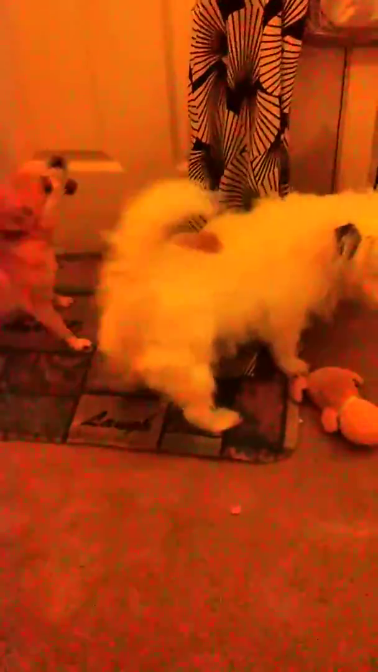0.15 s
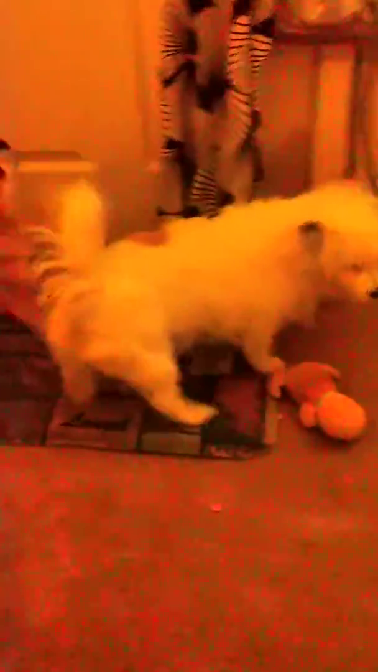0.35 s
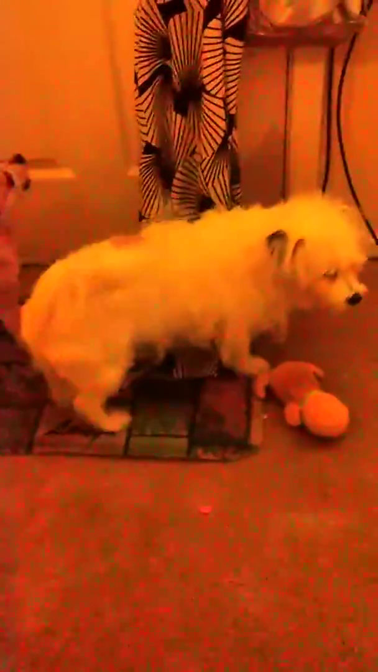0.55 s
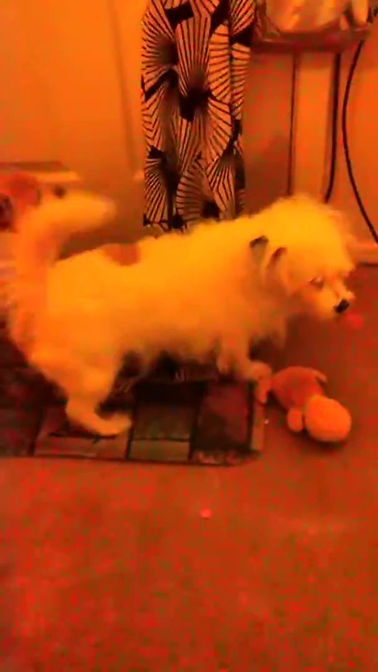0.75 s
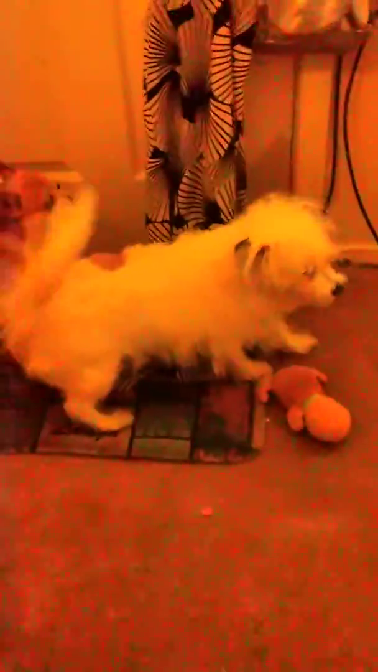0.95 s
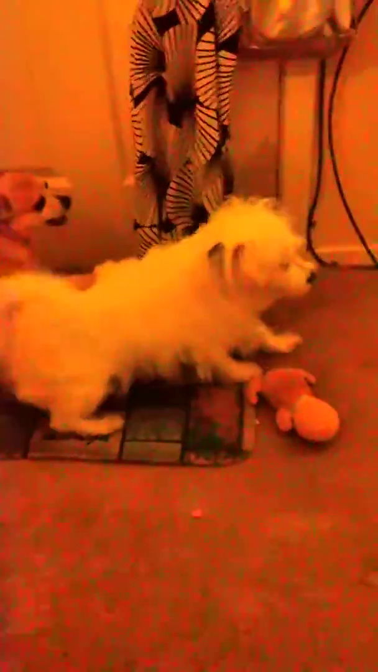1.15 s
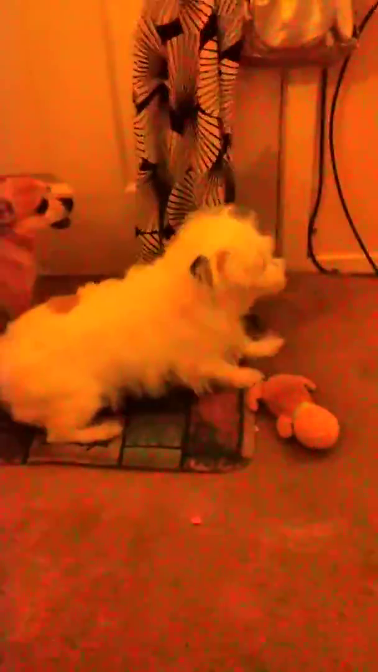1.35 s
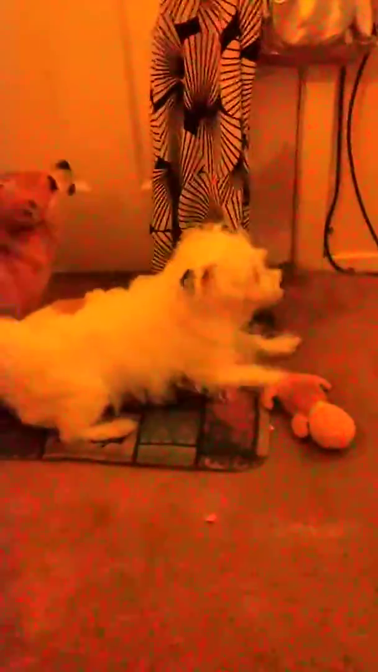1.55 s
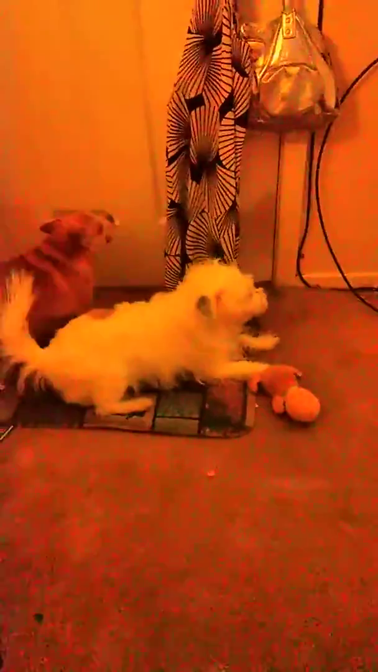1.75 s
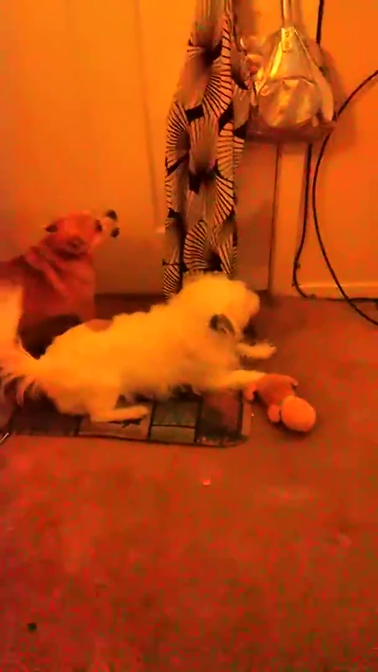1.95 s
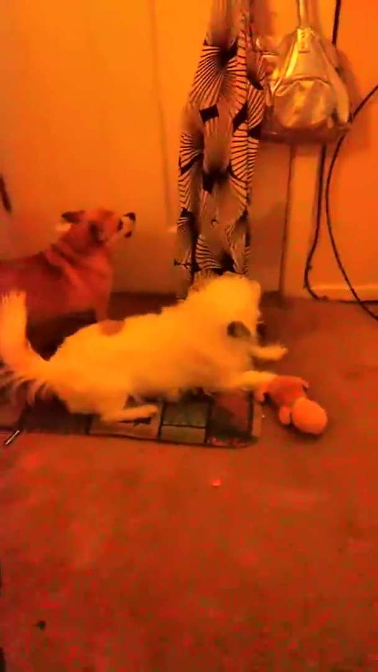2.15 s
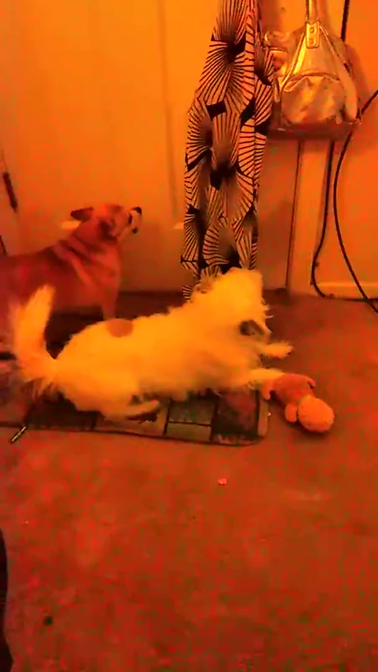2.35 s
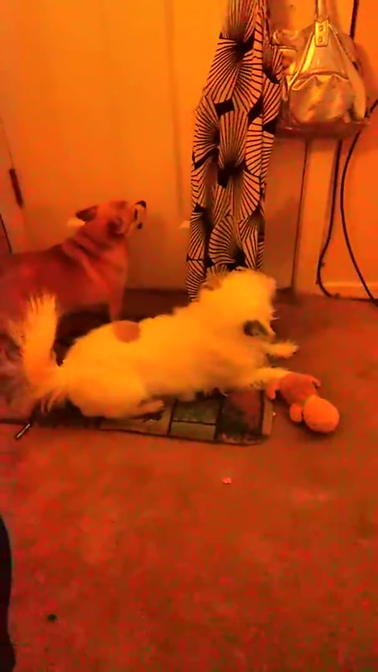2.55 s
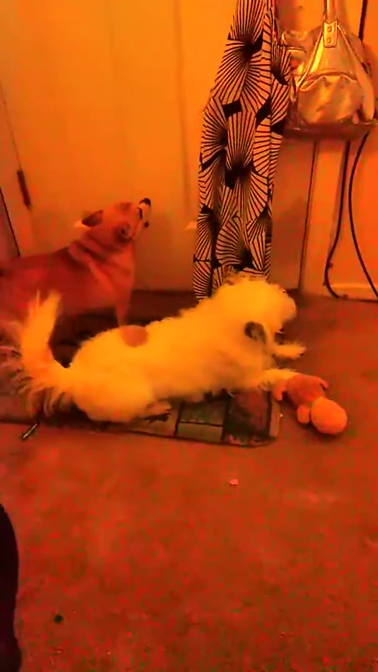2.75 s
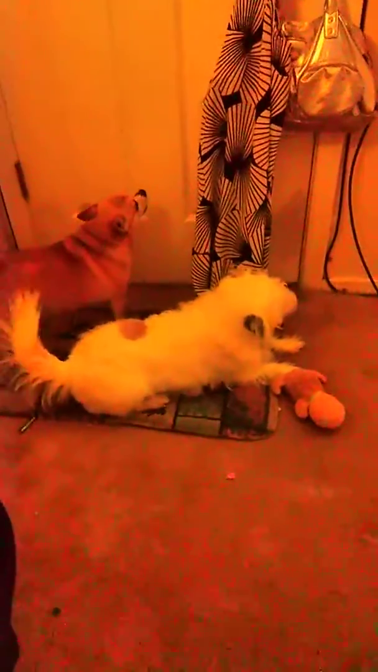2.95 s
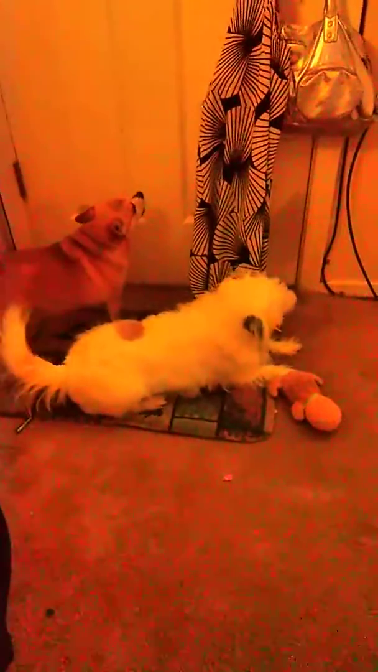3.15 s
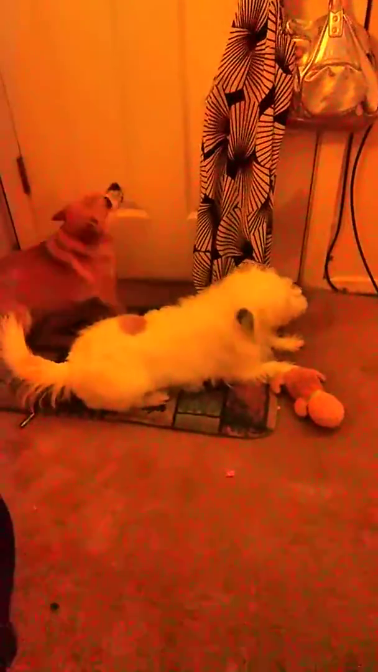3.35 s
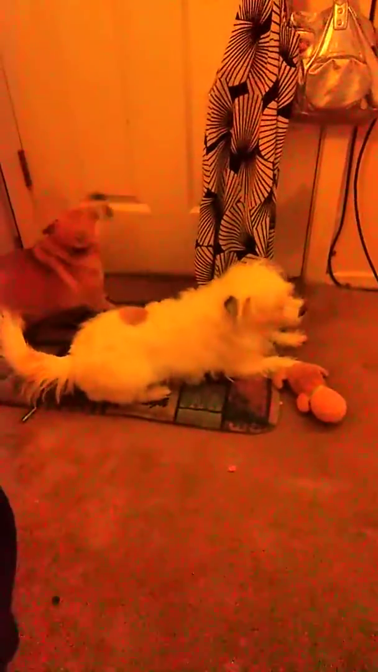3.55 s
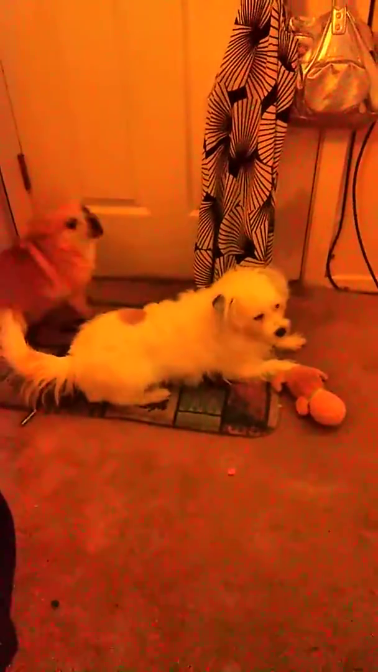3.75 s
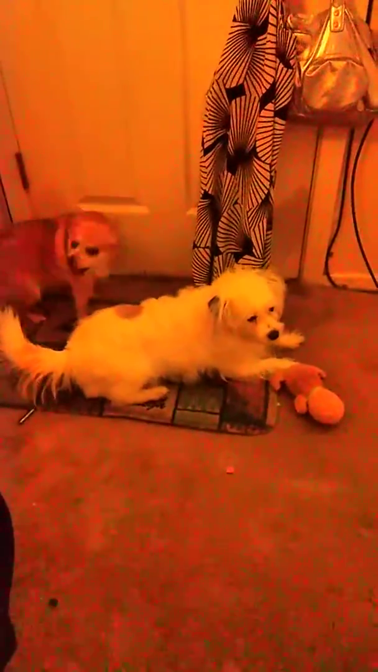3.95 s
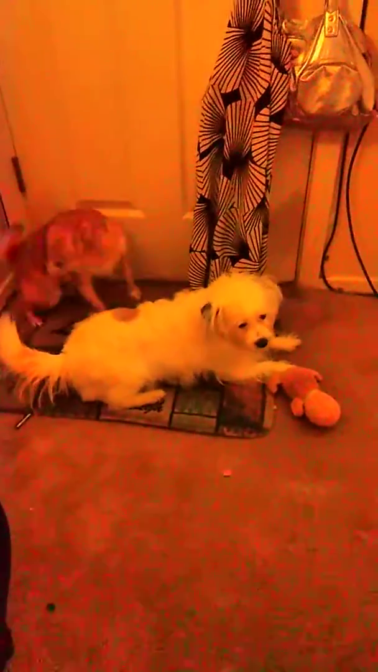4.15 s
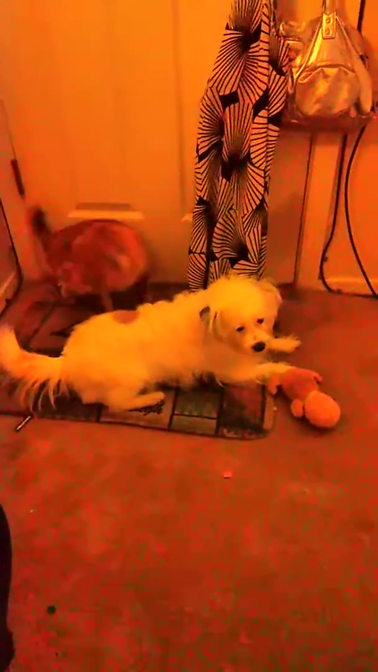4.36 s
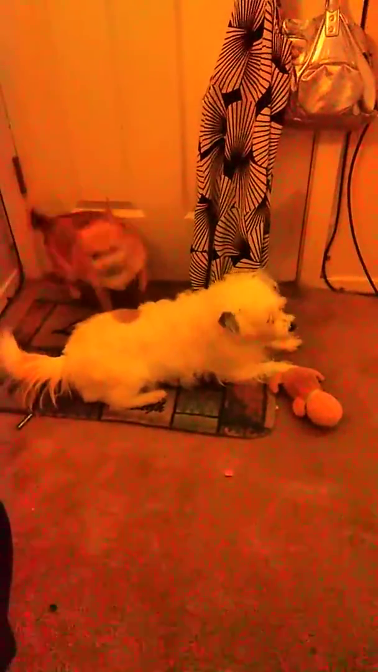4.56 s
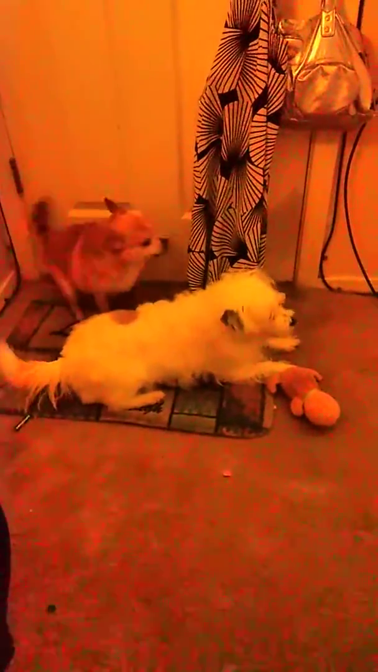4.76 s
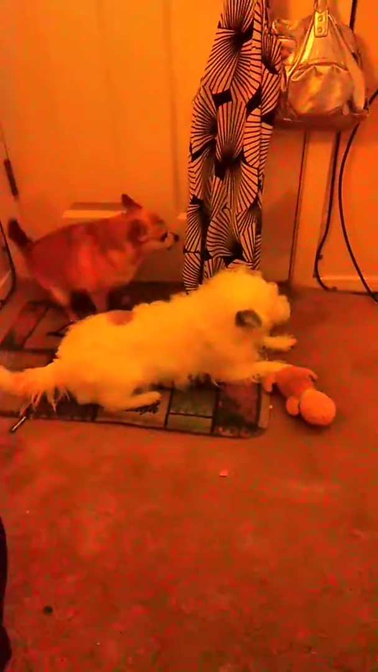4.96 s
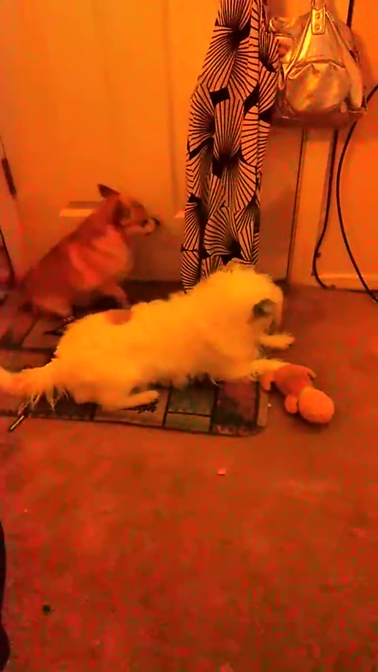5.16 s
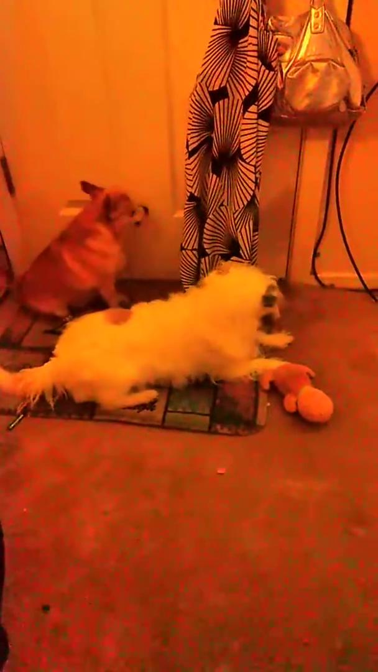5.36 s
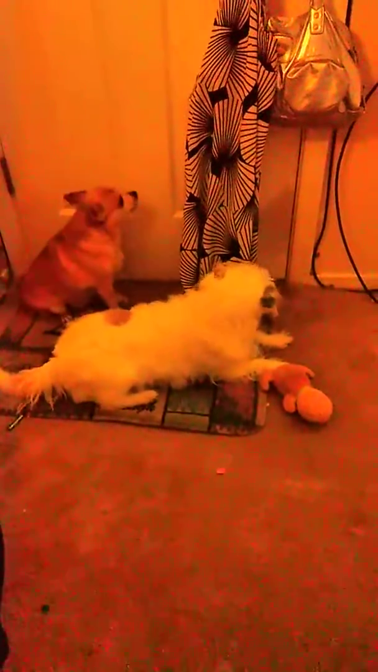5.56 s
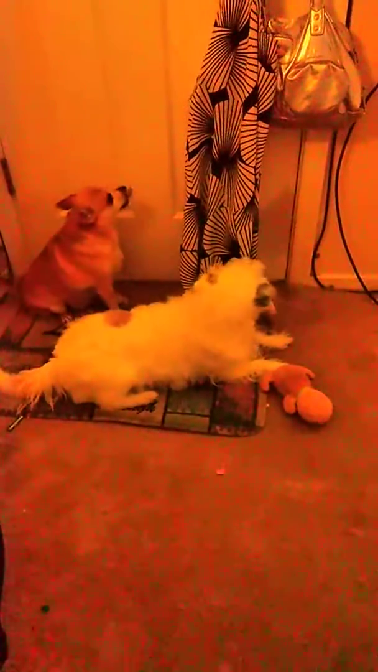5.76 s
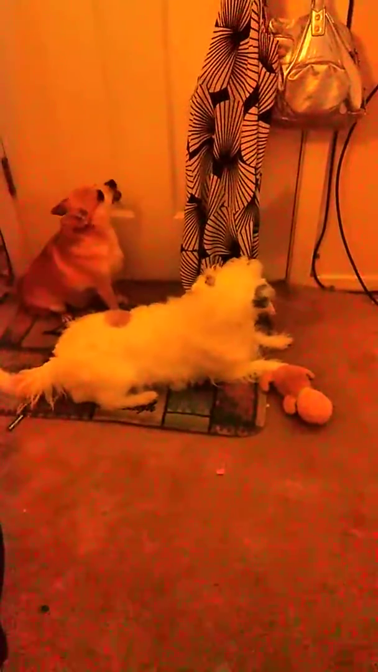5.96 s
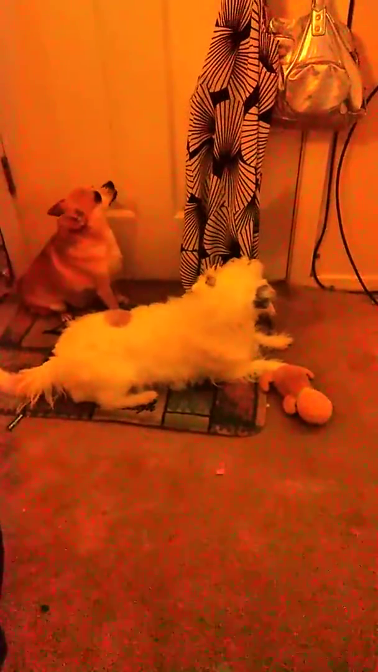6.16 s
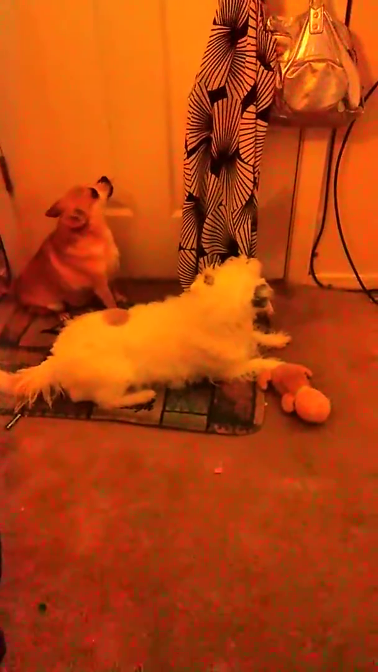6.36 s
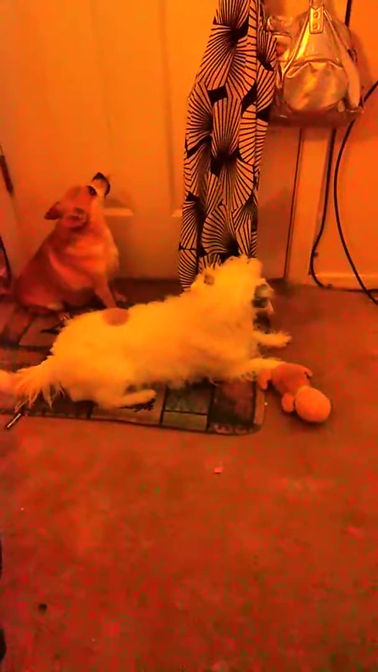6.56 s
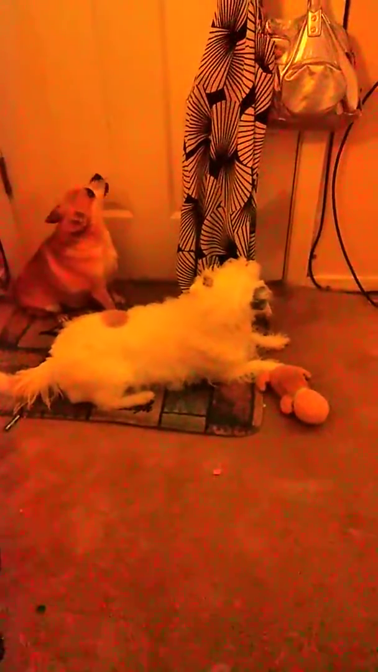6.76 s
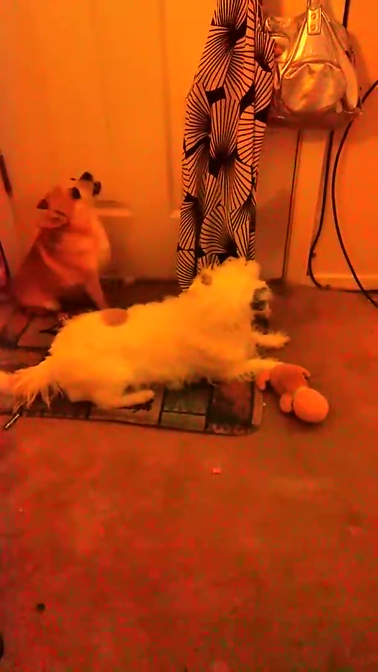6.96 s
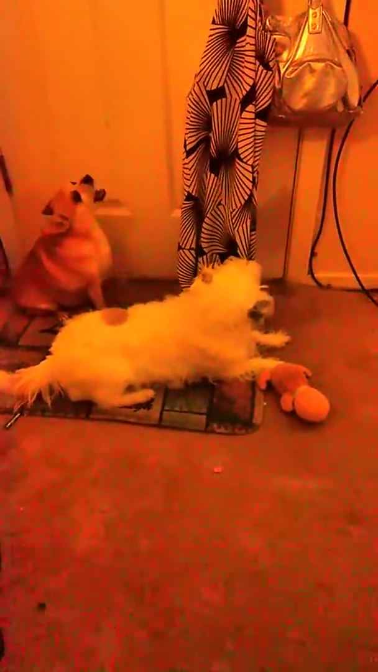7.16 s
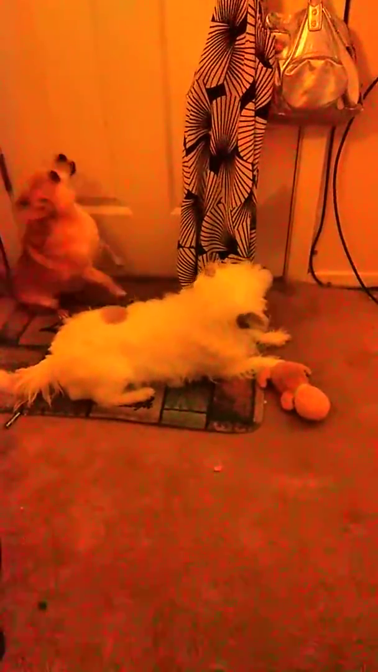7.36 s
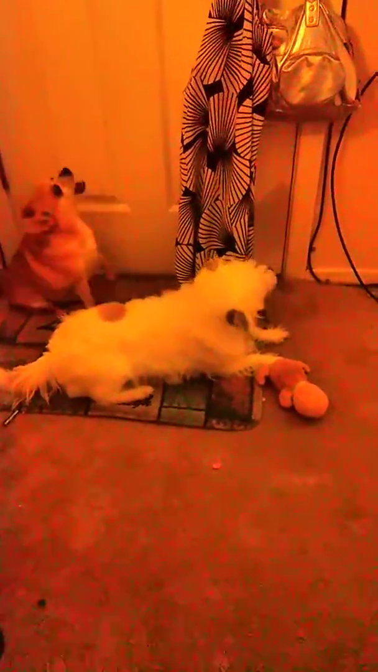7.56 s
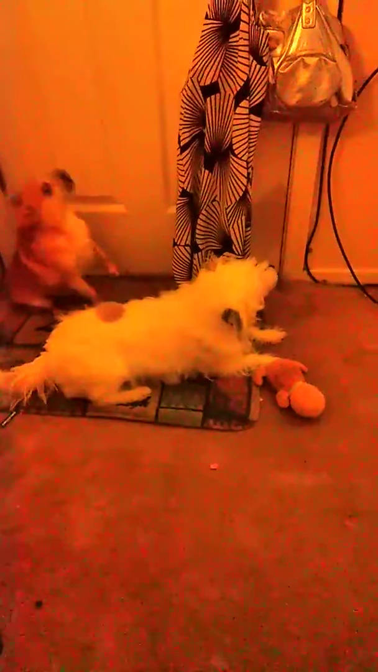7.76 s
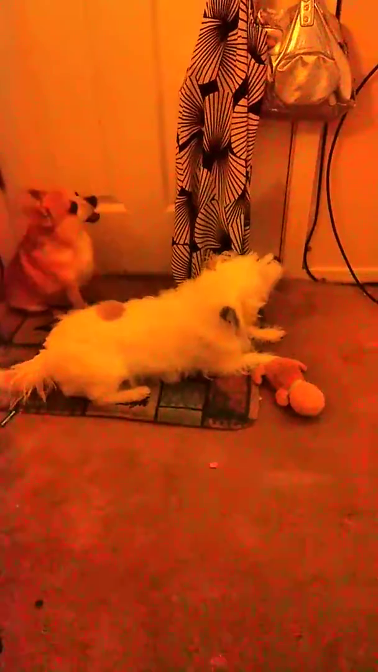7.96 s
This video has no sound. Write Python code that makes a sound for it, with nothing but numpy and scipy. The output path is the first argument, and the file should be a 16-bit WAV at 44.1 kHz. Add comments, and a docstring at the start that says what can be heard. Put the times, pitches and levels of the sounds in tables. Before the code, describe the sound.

Indoors by a door, sharp high yaps and lower breaking barks come from two dogs, with faint snuffles, thumps and a low room hum between.

```python
"""Two small dogs bark at a door in a carpeted room: one yaps in high, raspy arches and ends on a thin whine,
the other barks lower, its voice breaking upward in mid-bark. Both are pulsing-fold harmonics through a throat
filter, plus gated noise for rasp. Between barks: a stuttering pulsed grunt, snuffles and ticks of filtered
noise, thumps of damped sines. Hum is coloured noise with a drone; echoes and a short tail make the room."""
import sys
import numpy as np
from scipy import signal
from scipy.fft import rfft, irfft, next_fast_len
from scipy.io import wavfile
from scipy.ndimage import uniform_filter1d, minimum_filter1d

SR = 44100
rng = np.random.default_rng(int(sys.argv[2]) if len(sys.argv) > 2 else 0)


def bounce(signal):
    """Save signal as a 16-bit WAV file at the path given by the first command-line argument."""
    frames = np.transpose(np.atleast_2d(signal))
    limited = np.clip(frames, -1, 1)
    pcm = np.round(limited * 32767).astype(np.int16)
    wavfile.write(sys.argv[1], SR, pcm)


N = 352800

# Source levels are relative: room and mix gains follow.
# High yaps. Each row: start, crest and end in seconds, start and crest pitch in Hz, level in dB,
# rasp in relative dB (capped at 4), twang in dB, half-pitch lines in dB.
YAPS = [(.211, 0.291, 0.34, 560, 1306, -15, -8, 8, -6.5),
        (1.885, 1.962, 2.012, 898.7, 1566, -16, 2.5, -2.5, -29),
        (3.241, 3.334, 3.384, 992, 1581, -16, 6, -3.5, -32.5),
        (3.639, 3.708, 3.772, 818.7, 1528, -15.5, 2.5, 1, -31.5),
        (6.844, 6.918, 6.962, 1155, 1553, -14.5, 1, -4.5, -32),
        (7.254, 7.334, 7.384, 1138, 1648, -13.5, -1.5, -12.5, -48),
        (7.66, 7.735, 7.79, 874, 1540, -13.5, 1.5, -1.5, -33)]
# The yapper's throat, and the hiss in it. Each row: frequency in Hz, gain in dB.
YAP_THROAT = [(600, -18.5), (900, 5.5), (1250, -0.5), (1550, 1.5), (1900, -0.5), (2150, -12), (2350, -2),
              (2600, -28), (3100, -10.5), (3800, -27), (5500, -29), (7500, -41), (10000, -54.5),
              (12500, -39.5), (15000, -103)]
YAP_RASP = [(170, -14), (450, -17.5), (750, -13.5), (1050, -3.5), (1450, -3), (2050, 3.5), (2500, -8),
            (3200, -5.5), (4200, -12.5), (5500, -57), (7800, -26), (9800, -36.5), (12500, -28.5),
            (15000, -65.5)]
# Lower barks. Each row: start, voice break and end in seconds, crest pitch in Hz, level in dB,
# rasp in relative dB (capped at 3), twang in dB.
BARKS = [(0.839, 0.895, 1.024, 956, -16.5, -2.5, -3), (2.378, 2.452, 2.574, 946.5, -15.5, 1.5, -4.5),
         (3.931, 3.997, 4.122, 922, -16.5, 16.5, -8), (5.358, 5.417, 5.538, 947.7, -16, -5.5, -3),
         (7.058, 7.123, 7.246, 944.7, -15, 3, -3)]
# The lower dog's throat, and the hiss in it. Each row: frequency in Hz, gain in dB.
BARK_THROAT = [(250, -2), (450, -7.5), (650, -1.5), (790, -5), (960, 2.5), (1200, -26), (1450, -13),
               (1850, 1), (2100, -12), (2400, -8.5), (2800, -18.5), (3400, -32.5), (4900, -34.5),
               (5700, -46), (6800, -32), (9500, -64), (14000, -61)]
BARK_RASP = [(150, -15.5), (500, -1.5), (950, 5.5), (1200, -17.5), (1800, -9.5), (2500, -11), (3400, -17.5),
             (4900, -12), (5600, -32.5), (6800, -16), (9500, -38), (14000, -27), (16000, -32.5)]
# Course of the closing whine. Each row: time in seconds, pitch in Hz, level in relative dB.
WHINE = [(7.9, 1563, -21), (7.912, 1566, -31), (7.94, 1435, -16.5), (7.954, 1474, -29),
         (7.972, 1459, -18.5), (8.0, 1390, -30.5)]
# Throat during the whine. Each row: frequency in Hz, gain in dB.
WHINE_THROAT = [(1500, -1), (2900, -21.5), (4400, -40), (5900, -36), (7300, -46), (9000, -55)]
# Puffs of the grunt. Each row: start in seconds, length in seconds, level in dB.
GRUNTS = [(1.483, .014, -27.5), (1.514, 0.02, -29.5), (1.531, .032, -24.5)]
# Throat during the grunt. Each row: frequency in Hz, gain in dB.
GRUNT_THROAT = [(150, -3), (600, -14.5), (850, -6.5), (1180, -6), (1700, -25), (3500, -32.5), (9000, -58)]
# Snuffles. Each row: start in seconds, length in seconds, level in dB.
SNUFFLES = [(0.694, 0.11, -51.5), (1.323, 0.12, -43), (1.436, 0.028, -43), (1.552, 0.098, -43.5),
            (2.702, 0.27, -50), (3.156, 0.061, -52), (3.489, 0.12, -50), (4.476, 0.13, -45),
            (7.871, 0.062, -43)]
# Spectrum of air in the snout. Each row: frequency in Hz, gain in dB.
SNOUT = [(710, -79), (1200, -25.5), (1610, -11.5), (2020, 3), (2650, -9.5), (3220, -18), (6800, -28.5),
         (8260, -36.5), (8910, -48), (10600, -32), (16000, -54)]
# Soft thumps on the floor. Each row: start in seconds, level in dB, frequency in Hz, t60 in seconds.
THUMPS = [(1.377, -7.5, 81.6, 0.056), (1.485, -24, 157, 0.088), (1.583, -23, 127.7, 0.093),
          (1.87, -30, 185.4, 0.22), (2.326, -28.5, 124, 0.12), (2.744, -27, 135, 0.19),
          (3.563, -26, 93.1, 0.052), (3.851, -30.5, 103, 0.18), (4.372, -33, 65, 0.31)]
# Small ticks and taps. Each row: start in seconds, level in relative dB, treble relative to the knock in dB.
TICKS = [(0.195, -11.5, -27), (1.363, -14, -30), (1.375, -16, -30), (3.914, -7.5, -22), (4.272, -41, 13.5),
         (5.341, -14, -35), (6.467, -25.5, -28), (6.624, -28.5, -24), (6.668, -23.5, -32), (6.77, -26, -27)]
# Spectrum of the room hum. Each row: frequency in Hz, relative density in dB.
HUM = [(42, -18), (52, -9), (85, -7.5), (115, -16.5), (175, -4), (245, -4.5), (354, -13), (531, -14),
       (700, -18.5), (1900, -28), (3200, -37.5), (6500, -50.5), (14000, -62)]
# Room decay. Each row: frequency in Hz, t60 in seconds.
ROOM_T60 = [(150, 0.57), (600, 0.32), (1200, 0.31), (2400, 0.29), (6000, 0.35), (14000, 0.23)]
# First echoes off door, floor and walls. Each row: delay at left and at right port in seconds,
# level in dB relative to near_db.
ECHOES = [(.0031, .0034, -40.5), (.0073, .0069, -8), (0.0128, .0124, -2), (0.0183, 0.016, -35.5)]
# Room resonances that sing on after a bark. Each row: frequency in Hz, peak gain in dB, t60 in seconds.
ROOM_MODES = [(639, -14, .22), (945, -4, .42), (1190, -9, .35), (1505, -10, .35), (1890, -8, .3),
              (2356, -3, .45)]
# The left port faces the dogs, hears more treble. Each row: frequency in Hz, left minus right in dB.
FACING = [(60, 2), (170, -0.5), (300, 2), (600, -2.5), (1100, 1.5), (2000, 7), (5000, 6.5), (12000, 6)]
# A tightened throat lifts upper partials. Each row: frequency in Hz, lift in dB per dB of twang.
TWANG = [(1300, 0.12), (1900, 0.36), (2400, 0.63), (3300, 1.14), (4500, 1.23), (6500, 0.9), (9000, 0.48),
         (13000, 0.92)]

HUM_DB = -46
TOP_HZ = 16300
# pitch arch of a yap: power 1 = straight sides, 2 = round; ends at a share of its crest
YAP_RISE_POWER, YAP_FALL_POWER, YAP_END_SHARE = 1.5, 1.7, .56
YAP_ATTACK_S, YAP_RELEASE_S = 0.032, 0.018
# rasp bursts out first, clears towards the crest, returns as the folds slacken
YAP_RASP_ATTACK_S, YAP_CLEAR_DB, YAP_SLACK_DB = 0.02, -23.5, -15
# depths before each voice's own scaling
FLUTTER_HZ, YAP_FLUTTER_DEPTH, GROWL_FLUTTER_DEPTH = 210, .55, .28
YAP_PAN_DB, BARK_PAN_DB = -0.5, 2.5  # left minus right
# growl rises and levels off (shares of crest pitch); after the break the note holds, then drops ever faster
GROWL_START_SHARE, GROWL_TOP_SHARE, GROWL_POWER = .25, .68, 2.0
NOTE_END_SHARE, NOTE_DROP_POWER, BREAK_S = .22, 3.5, .004
BARK_ATTACK_S, BARK_RELEASE_S, BARK_RASP_ATTACK_S = 0.047, 0.041, 0.026
NOTE_DB, NOTE_RASP_DB = -6, -10  # relative to the growl
GRUNT_HZ, GRUNT_EDGE_S = 580.5, 0.0039
YAP_LAG_S, BARK_LAG_S = -.00012, 0.00016  # right port behind left
LIMIT_PEAK, LIMIT_S = .99, .002


def undb(db):
    """Decibels to gain."""
    return 10 ** (np.asarray(db) / 20)


def unit(x):
    """Scale to rms 1."""
    return x / np.sqrt(np.mean(x ** 2) + 1e-18)


def read(points, hz):
    """Read (Hz, value) points on a log-frequency axis."""
    f, value = np.transpose(points)
    return np.interp(np.log(hz + 1e-6), np.log(f), value)


def colour(x, points):
    """Filter by (Hz, dB) points, falling away below the first."""
    size = next_fast_len(x.shape[-1] + 2048)
    hz = np.fft.rfftfreq(size, 1 / SR)
    gain = undb(read(points, hz)) * np.minimum(hz / points[0][0], 1) ** 2
    return irfft(rfft(x, size) * gain, size)[..., :x.shape[-1]]


def band(x, lo_hz, hi_hz):
    """Band-pass."""
    sos = signal.butter(2, [lo_hz, min(hi_hz, SR / 2 - 1)], 'band', fs=SR, output='sos')
    return signal.sosfilt(sos, x)


def wobble(t, rate_hz):
    """Random wandering, rate_hz new values a second."""
    values = rng.standard_normal(size=2048)
    return np.interp((t - t[0]) * rate_hz, np.arange(len(values)), values)


def span(start_s, end_s):
    """Sample times between two moments."""
    return np.arange(int(start_s * SR), int(end_s * SR)) / SR


def progress(t, start_s, end_s):
    """0 before start, 1 after end, straight in between."""
    return np.clip((t - start_s) / (end_s - start_s), 0, 1)


def envelope(t, attack_s, release_s):
    """Swell, hold, and die away to nothing at the last sample."""
    attack = np.minimum((t - t[0]) / attack_s, 1)
    release = np.minimum((t[-1] - t) / release_s, 1) ** 1.56
    return attack * release


def eased(x):
    """Fade in and out over about 8 ms, as a voice starts and stops over several cycles."""
    return x * signal.windows.tukey(len(x), min(SR / 60 / len(x), 1))


def add(out, start_s, x, pan_db=0):
    """Mix a sound in, pan_db louder on the left than on the right."""
    i = int(start_s * SR)
    part = x[:N - i]
    out[:, i:i + len(part)] += part * undb(np.array([[pan_db], [-pan_db]]) / 2)


def hum():
    """A low steady rush with a faint motor drone in it."""
    t = np.arange(N) / SR
    mid, side = colour(rng.standard_normal((2, N)), HUM)
    side = side - 0.37 * band(side, 90, 600)  # narrower bass
    rush = (mid + 0.52 * side * np.array([[1], [-1]])) / np.std(mid)
    drone = undb(-58.5) * np.sin(2 * np.pi * 170.3 * t) * (1 + 1.3 * wobble(t, 1.9))
    drone = drone + undb(-53) * np.sin(2 * np.pi * 116 * t) * (1 + 1.6 * wobble(t, 19))
    return rush * undb(HUM_DB + 0.33 * wobble(t, 2.8)) + drone


def earlier_ring():
    """The room's ring from an earlier yap: band noise dying away at 123 dB a second."""
    out = np.zeros((2, N))
    t = span(0, 0.61)
    add(out, 0, unit(band(rng.standard_normal(len(t)), 1040, 1860)) * undb(-34 - 123 * t))
    return out


def ticks():
    """Ticks as the dogs shift about: a short noise knock with some treble, both decaying together."""
    out = np.zeros((2, N))
    t = np.arange(SR // 4) / SR
    for start, db, treble_db in TICKS:
        noise = rng.standard_normal(len(t))
        knock = unit(band(noise, 400, 1200))
        treble = undb(treble_db) * unit(band(noise, 1800, 15000))
        add(out, start, 0.24 * (knock + treble) * undb(db - 60 * t / 0.027))
    return out


def voice(t, hz, throat, jitter, shimmer, half_db, twang_db=0, hoarse=0):
    """Folds with uneven cycles, strong and weak in turn, heard through the throat; also returns their phase."""
    hz = hz * (1 + jitter * wobble(t, 700))
    phase = 2 * np.pi * np.cumsum(hz) / SR
    k = np.arange(1, 49)[:, None] / 2  # half steps: lines between the harmonics
    partial_hz = k * hz
    db = read(throat, partial_hz) + half_db * (k % 1 > 0) + twang_db * read(TWANG, partial_hz)
    # ragged closure of the folds smears the high partials most
    smear = hoarse * (partial_hz / 4000) ** 2 * np.array([wobble(t, 400) for _ in k])
    waves = np.sin(k * phase + np.clip(smear, -6, 6))
    tone = np.sum(undb(db) * (partial_hz < TOP_HZ) * waves, axis=0)
    return np.sqrt(2) * tone * (1 + shimmer * wobble(t, 450)), phase


def rasp(phase, spectrum, depth):
    """Turbulent air, let through once a cycle, in uneven spurts."""
    spurts = undb(2.5 * wobble(np.arange(len(phase)) / SR, 220))
    gate = 1 + depth * np.cos(phase)
    return unit(colour(rng.standard_normal(len(phase)) * gate * spurts, spectrum))


def flutter(t, depth):
    """Loose tissue beats unevenly beside the folds and shakes the voice's level."""
    hz = FLUTTER_HZ * (1 + .2 * wobble(t, 150))
    return 1 + depth * np.sin(2 * np.pi * np.cumsum(hz) / SR)


def mouth(x, stage, shut_db, open_stage, closing_db=-2):
    """The treble blooms as the jaw opens and fades as it closes."""
    treble = signal.sosfiltfilt(signal.butter(2, 2000, 'high', fs=SR, output='sos'), x)
    db = shut_db * np.maximum(1 - stage / open_stage, 0) + closing_db * np.maximum(stage - 1, 0)
    return x + treble * (undb(db) - 1)


def yapper():
    """Each yap climbs roughly to a clear crest and drops."""
    out = np.zeros((2, N))
    for start, crest, end, start_hz, crest_hz, db, rasp_db, twang_db, half_db in YAPS:
        t = span(start, end)
        rise, fall = progress(t, start, crest), progress(t, crest, end)
        climb_hz = (crest_hz - start_hz) * (1 - rise) ** YAP_RISE_POWER
        drop_hz = crest_hz * (1 - YAP_END_SHARE) * fall ** YAP_FALL_POWER
        hz = (crest_hz - climb_hz - drop_hz) * (1 + .014 * wobble(t, 110))
        rough = undb(min(rasp_db, 4))
        # the folds are least steady while the pressure builds
        jitter = (.011 + .022 * (1 - rise)) * np.sqrt(rough)
        tone, phase = voice(t, hz, YAP_THROAT, jitter, shimmer=.13, half_db=half_db,
                            twang_db=twang_db, hoarse=.7 * rough)
        tone = tone * flutter(t, YAP_FLUTTER_DEPTH * rough * (1 - 0.72 * rise ** 2))
        tone = tone * envelope(t, YAP_ATTACK_S, YAP_RELEASE_S)
        air_db = YAP_CLEAR_DB * rise ** 2 * (1 - fall) + YAP_SLACK_DB * fall
        air = rasp(phase, YAP_RASP, depth=1.0) * undb(air_db)
        air = air * envelope(t, YAP_RASP_ATTACK_S, release_s=.006)
        yap = unit(tone) + unit(air) * rough * undb(-9.5)
        yap = mouth(yap, rise + fall, shut_db=-20.5, open_stage=0.58)
        add(out, start, undb(db) * yap, YAP_PAN_DB)
    return out


def snuffles():
    """Air drawn through the snout: coloured noise, softly edged, its level wavering."""
    out = np.zeros((2, N))
    for start, length, db in SNUFFLES:
        t = span(start, start + length)
        air = unit(colour(rng.standard_normal(len(t)), SNOUT)) * undb(0.63 * wobble(t, 120))
        add(out, start, undb(db) * air * signal.windows.tukey(len(t), .7), pan_db=3.5)
    return out


def barker():
    """A low rising growl breaks up by about a fifth into a ringing note, then slides down as the jaw closes."""
    out = np.zeros((2, N))
    for start, crack, end, crest_hz, db, rasp_db, twang_db in BARKS:
        t = span(start, end)
        rise, fall = progress(t, start, crack), progress(t, crack, end)
        broken = progress(t, crack - BREAK_S / 2, crack + BREAK_S / 2)
        growl = GROWL_TOP_SHARE - (GROWL_TOP_SHARE - GROWL_START_SHARE) * (1 - rise) ** GROWL_POWER
        note = 1 - (1 - NOTE_END_SHARE) * fall ** NOTE_DROP_POWER
        hz = crest_hz * (growl + broken * (note - growl)) * (1 + .01 * wobble(t, 70))
        # after the break the folds beat strong-weak, which puts lines between the harmonics
        half_db = -26 + broken * (21 - 12 * fall)
        tone, phase = voice(t, hz, BARK_THROAT, jitter=.008, shimmer=.14, half_db=half_db,
                            twang_db=twang_db, hoarse=.7)
        tone = tone * flutter(t, GROWL_FLUTTER_DEPTH * (1 - 0.704 * broken)) * undb(NOTE_DB * broken)
        tone = tone * envelope(t, BARK_ATTACK_S, BARK_RELEASE_S)
        air = rasp(phase, BARK_RASP, depth=1.0) * undb(NOTE_RASP_DB * broken)
        air = air * envelope(t, BARK_RASP_ATTACK_S, release_s=0.052)
        bark = unit(tone) + unit(air) * undb(min(rasp_db, 3) - 15)
        bark = mouth(bark, rise + fall, shut_db=-18.5, open_stage=0.3)
        add(out, start, undb(db) * bark, BARK_PAN_DB)
    return out


def thumps():
    """The carpeted floor gives a few damped swings under each bump."""
    out = np.zeros((2, N))
    t = np.arange(SR // 4) / SR
    contact = 1 - np.exp(-(t / .0008) ** 2)
    for start, db, hz, t60 in THUMPS:
        swing = np.sin(2 * np.pi * hz * t + np.pi * 2 / 3)
        add(out, start, undb(db - 60 * t / t60) * swing * contact)
    return out


def grunt():
    """A stuttering grunt: short puffs of unsteady voice with rasp."""
    out = np.zeros((2, N))
    for start, length, db in GRUNTS:
        t = span(start, start + length)
        tone, phase = voice(t, GRUNT_HZ, GRUNT_THROAT, jitter=0.048, shimmer=0.23, half_db=-17.5)
        puff = tone + undb(-7) * rasp(phase, GRUNT_THROAT, depth=.8)
        add(out, start, undb(db) * puff * envelope(t, GRUNT_EDGE_S, GRUNT_EDGE_S))
    return out


def whine():
    """The yapper's voice again, held softly on one thin note."""
    out = np.zeros((2, N))
    s, hz, db = np.transpose(WHINE)
    t = span(s[0], s[-1])
    tone, phase = voice(t, np.interp(t, s, hz), WHINE_THROAT, jitter=0.0058, shimmer=0.14,
                        half_db=-49, hoarse=0.89)
    note = tone + undb(-23.5) * rasp(phase, YAP_RASP, depth=0.45)
    add(out, s[0], eased(note) * undb(np.interp(t, s, db) + 1.5), pan_db=0.5)
    return out


def room(x, near_db, tail_db, linger_db, lag_s=0):
    """Direct sound, lag_s later at the right port, then quick echoes and a diffuse tail with a few resonances."""
    t = np.arange(SR) / SR
    hz = np.fft.rfftfreq(SR, 1 / SR)
    noise = rfft(rng.standard_normal((2, SR)))
    # the two ports hear the same bass
    alike = 1 / (1 + (hz / 800) ** 2)
    noise[1] = alike * noise[0] + np.sqrt(1 - alike ** 2) * noise[1]
    centres_hz, t60s = np.transpose(ROOM_T60)
    tail = 0
    for share, t60 in zip(np.eye(len(centres_hz)), t60s):
        part = irfft(noise * read(np.c_[centres_hz, share], hz), SR)
        lingering = undb(linger_db - 60 * t / (4.37 * t60))
        tail = tail + part * (undb(-60 * t / t60) + lingering)
    response = undb(tail_db) * unit(tail * np.minimum(t / 0.004, 1)) / np.sqrt(SR)
    for mode_hz, db, t60 in ROOM_MODES:
        peak_scale = 2 * np.log(1000) / (t60 * SR)  # gain 1 at resonance
        response += undb(db - 60 * t / t60) * np.cos(2 * np.pi * mode_hz * t) * peak_scale
    for left_s, right_s, db in ECHOES:
        response[[0, 1], [int(left_s * SR), int(right_s * SR)]] += undb(near_db + db)
    late = np.interp(np.arange(N) - lag_s * SR, np.arange(N), x[1])
    direct = np.array([x[0], late])
    return direct + signal.fftconvolve(x.mean(axis=0)[None], response, axes=1)[:, :N]


def scene():
    """Both dogs in the room; the ring of an earlier yap is still dying away at first."""
    high = room(yapper() + whine(), near_db=-2.5, tail_db=-3.5, linger_db=-31.5, lag_s=YAP_LAG_S)
    low = room(barker(), near_db=-1.0, tail_db=-4.0, linger_db=-33, lag_s=BARK_LAG_S)
    small = room(ticks() + snuffles() + grunt(), near_db=-1, tail_db=-1.5, linger_db=-63)
    return undb(2.0) * high + undb(2.5) * low + small + thumps() + earlier_ring() + hum()


def record(dry):
    """Two microphone ports colour the sound differently; a limiter acts on peaks and the top is cut."""
    ports = []
    for x, side in zip(dry, (1, -1)):
        points = [(30, 0.0048)] + [(hz, side * db / 2) for hz, db in FACING]  # bass falls below 30 Hz
        ports.append(colour(x, points))
    ports = np.array(ports)
    size = int(LIMIT_S * SR)
    gain = LIMIT_PEAK / np.maximum(np.abs(ports), LIMIT_PEAK)
    gain = uniform_filter1d(minimum_filter1d(gain, size), size)
    top_cut = signal.ellip(10, .2, 80, TOP_HZ, fs=SR, output='sos')
    return signal.sosfilt(top_cut, ports * gain)


dry = scene()
out = record(dry)
bounce(out)
```